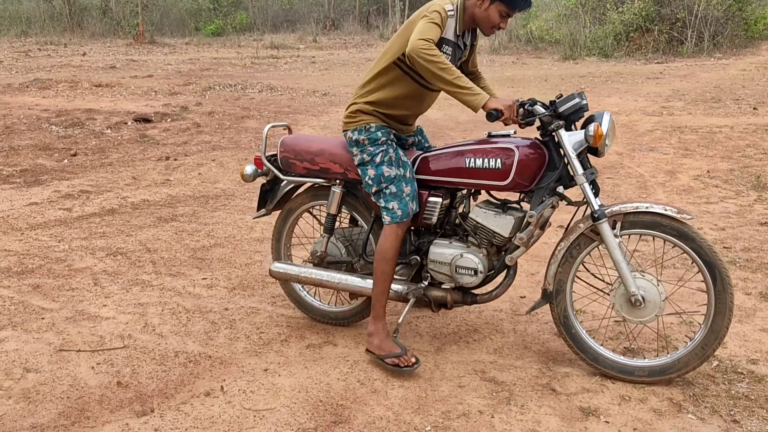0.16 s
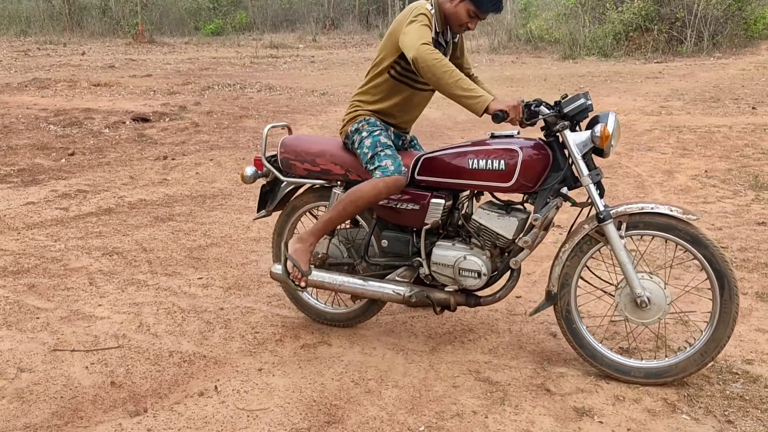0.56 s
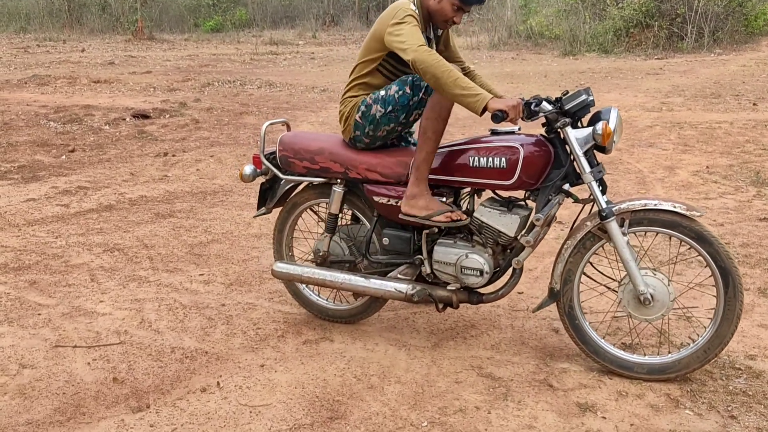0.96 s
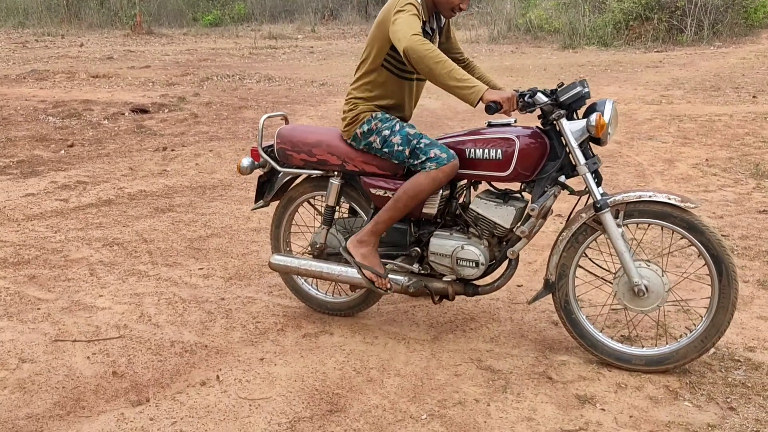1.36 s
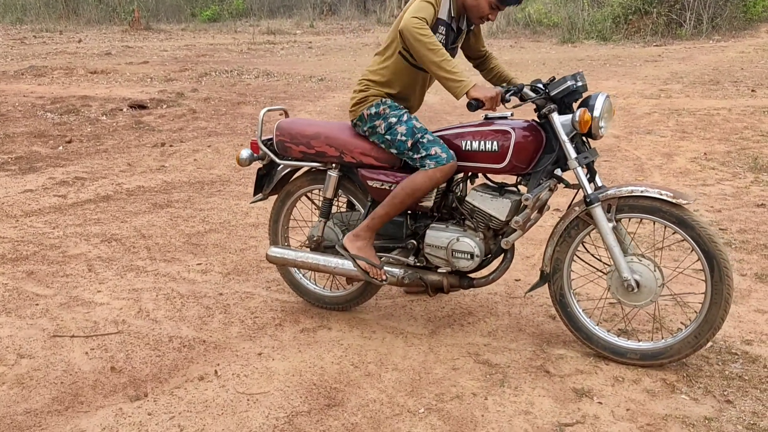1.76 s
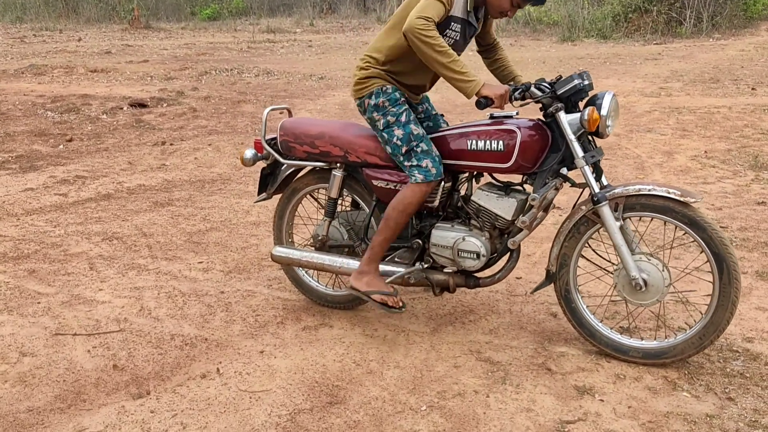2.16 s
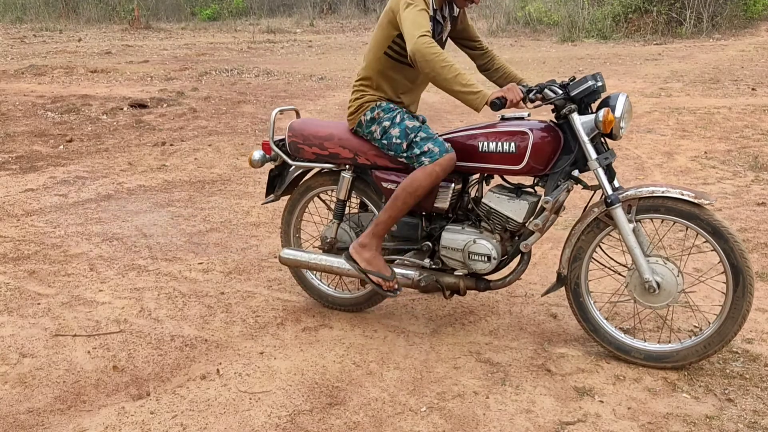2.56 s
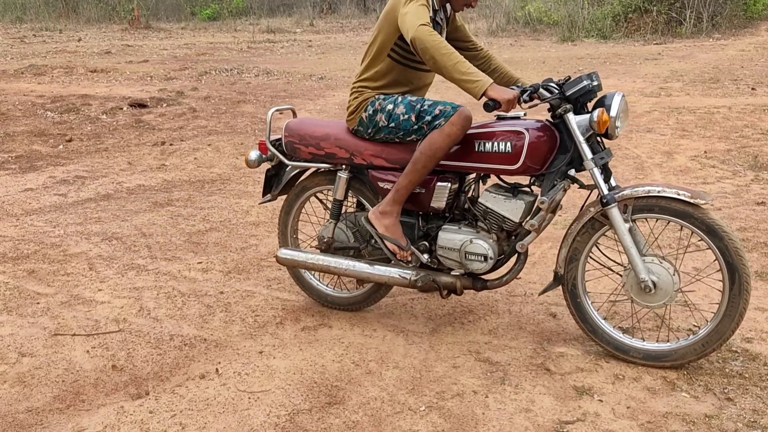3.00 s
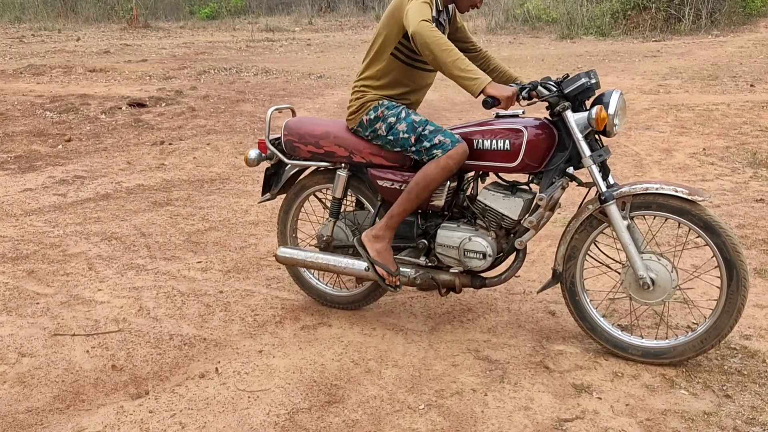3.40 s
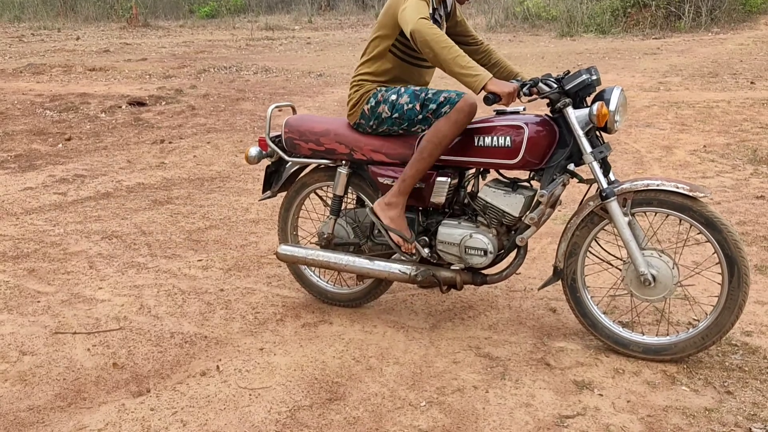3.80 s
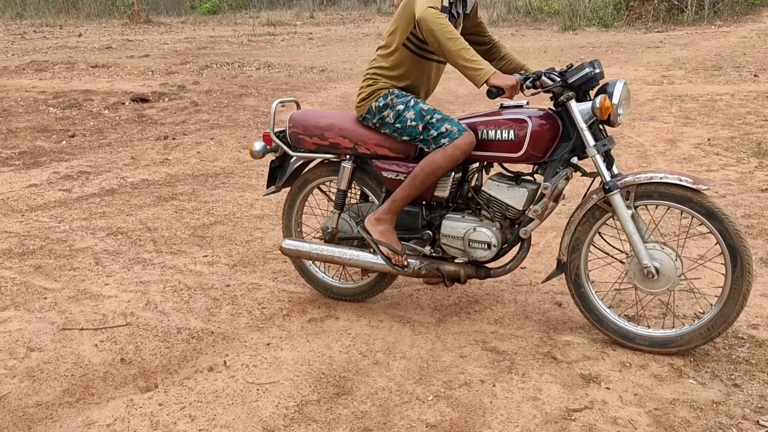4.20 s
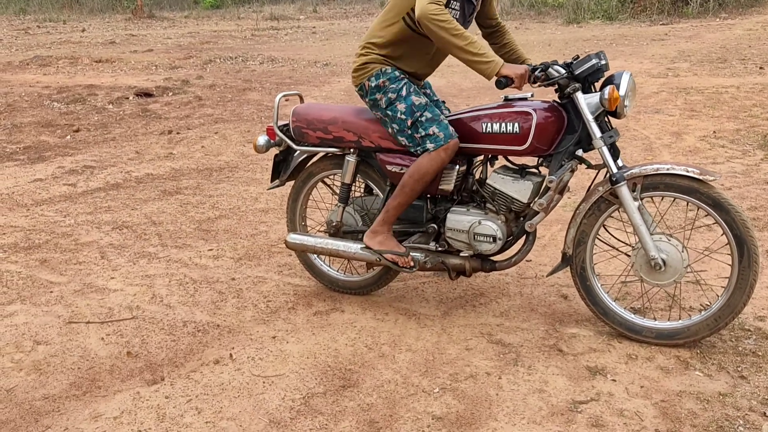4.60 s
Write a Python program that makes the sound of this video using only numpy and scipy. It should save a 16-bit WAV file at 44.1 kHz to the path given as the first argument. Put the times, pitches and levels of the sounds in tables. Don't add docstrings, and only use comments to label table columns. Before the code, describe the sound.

A small two-stroke engine is kicked over twice outdoors without firing, with dull exhaust thumps, rasping gears, metallic lever slams and foot clacks.

```python
import sys
import numpy as np
from scipy import signal
from scipy.fft import rfft, irfft, next_fast_len
from scipy.io import wavfile
from scipy.ndimage import uniform_filter1d

SR = 44100
rng = np.random.default_rng(int(sys.argv[2]) if len(sys.argv) > 2 else 0)


def bounce(signal):
    frames = np.transpose(np.atleast_2d(signal))
    limited = np.clip(frames, -1, 1)
    pcm = np.round(limited * 32767).astype(np.int16)
    wavfile.write(sys.argv[1], SR, pcm)


def magnitude_from_level(level_db):
    exponent = np.asarray(level_db, float) / 20
    return 10 ** exponent


N = 209430
TIME_S = np.arange(N) / SR
MIC_EDGE_HZ = 9750

# hz, level_db
PORT_BALANCE_DB = [(60, 5.5), (400, 5), (1500, 1.5), (3000, -0.5), (4500, 0.5), (6500, -7.5), (8500, 1),
                   (12000, 10)]


def rms_one(x):
    return x / np.sqrt(np.mean(x ** 2) + 1e-20)


def at_hz(points, hz):
    points_hz, values = np.transpose(points)
    return np.interp(np.log(hz), np.log(points_hz), values)


def add(track, start_s, sound):
    i = round(start_s * SR)
    track[..., i:i + sound.shape[-1]] += sound[..., :N - i]


def drift(rate_hz):
    r = np.exp(-80 * np.pi * rate_hz / SR)
    white = rng.standard_normal(N // 40 + 2002)
    slow = signal.lfilter([1], [1, -2 * r, r * r], white)[2000:]
    return np.interp(np.arange(N) / 40, np.arange(len(slow)), rms_one(slow))


def band(x, low_hz, high_hz):
    return signal.sosfilt(signal.butter(2, [low_hz, high_hz], "band", fs=SR, output="sos"), x)


def resonance(x, hz, width_hz):
    return np.sqrt(SR / 2 / width_hz) * band(x, hz - width_hz / 2, hz + width_hz / 2)


def grains(per_s, spread_db, shape):
    sizes = magnitude_from_level(spread_db * np.minimum(rng.exponential(1, shape), 4)) * rng.choice([-1, 1], shape)
    clicks = rms_one(sizes * (rng.random(shape) < per_s / SR))
    return rms_one(clicks / np.sqrt(uniform_filter1d(clicks ** 2, size=200, axis=-1) + 0.2))


def banded(source, spectrum, patchy_db, rate_hz):
    # hz, likeness
    likeness = [(60, 0.96), (300, 0.6), (1000, 0.23), (3000, 0.81), (9000, 0.22)]
    out, cuts_hz = 0, 20 * 2 ** np.arange(0, 9.6, .5)
    for k, (low, high) in enumerate(zip(cuts_hz, cuts_hz[1:])):
        hz = np.sqrt(low * high)
        if spectrum[0][0] < hz < spectrum[-1][0]:
            mid, side = band(source[k % 2], low, high)
            alike = at_hz(likeness, hz)
            gain = magnitude_from_level(at_hz(spectrum, hz) + patchy_db * drift(rate_hz))
            out = out + gain * (np.sqrt(1 + alike) * mid + np.sqrt(1 - alike) * side * [[1], [-1]])
    return rms_one(out)


def swell_fade(t, peak_s, db, swell_s, fade_s):
    return magnitude_from_level(db - 20 * np.where(t < peak_s, (peak_s - t) / swell_s, (t - peak_s) / fade_s))


def falling(top_hz, end_hz, length_s, bend):
    u = np.linspace(0, 1, round(length_s * SR))
    pitch_hz = end_hz + (top_hz - end_hz) * np.exp(-bend * u)
    return np.sqrt(np.abs(np.sin(np.pi * u))) * np.sin(2 * np.pi * np.cumsum(pitch_hz) / SR)


def wind(grit):
    # hz, level_db per Hz
    rumble_db = [(20, -8), (35, 0.5), (55, 0.5), (90, -4), (130, -17), (200, -19)]
    # time_s, level_db
    gusts = [(0.0, -65), (0.17, -61.5), (0.4, -56.5), (0.96, -61), (2.2, -62), (2.48, -57), (3.27, -61.5),
             (4.4, -56.5), (4.74, -58)]
    gust = magnitude_from_level(np.interp(TIME_S, *np.transpose(gusts)) + 2.5)
    rumble = banded(rng.standard_normal((2, 2, N)), rumble_db, patchy_db=1.0, rate_hz=4.0)
    return np.hypot(gust, magnitude_from_level(-12.5) * grit) * rumble


def drone(grit):
    # hz, level_db per Hz
    drone_db = [(80, -28.5), (120, -5), (165, 1.5), (210, 2), (300, -17), (450, -9), (650, -39.5),
                (900, -60.5)]
    # time_s, level_db
    far = [(0.0, -62.5), (0.24, -66), (0.43, -48.5), (0.79, -56.5), (1.29, -63.5), (2.3, -61.5),
           (2.48, -54.5), (2.84, -59.5), (4.74, -55)]
    strength = magnitude_from_level(np.interp(TIME_S, *np.transpose(far)) + 1.5)
    hum = banded(rng.standard_normal((2, 2, N)), drone_db, patchy_db=4.0, rate_hz=15.0)
    return np.hypot(strength, magnitude_from_level(-11) * grit) * hum


def moves():
    # peak_s, grit_db, cloth_over_grit_db, swell_s per 20 dB, fade_s per 20 dB
    rider = [(0.14, -76, 7.5, 1, -2.5), (0.25, -45, -8, 0.13, 0.47), (0.41, -40, 1.5, 0.18, 0.06),
             (0.65, -46.5, -11.5, 0.5, 0.16), (0.95, -66, -1.5, 1.3, 0.5), (1.3, -63.5, 4.5, 0.1, .5),
             (1.84, -54.5, 2.5, 0.37, 0.09), (1.96, -56.5, -2, 0.24, 0.16), (2.23, -68.5, 13, 0.1, 0.88),
             (2.32, -51, -11, 0.21, 0.85), (2.429, -38.5, -12, .08, 0.0833), (2.542, -40, 9.5, 0.052, 0.13),
             (2.6, -54.5, 12, -0.17, 0.21), (3.099, -62.5, -2, 0.2, -0.03), (3.532, -57.5, -15, 0.2, -0.25),
             (4.01, -58.5, -33, 0.33, 0.6), (4.2, -70, 4.5, 1.44, 0.94), (4.74, -62, 1, 0.4, 7)]
    t = np.arange(0, N + 64, 64) / SR
    peak_s, db, cloth_db, swell_s, fade_s = np.array(rider).T[:, :, None]
    grit = swell_fade(t, peak_s, db, np.abs(swell_s), np.abs(fade_s))
    total = [np.sqrt((g ** 2).sum(axis=0)) for g in (grit, grit * magnitude_from_level(cloth_db))]
    return [np.interp(TIME_S, t, g) for g in total]


def shuffle(grit):
    # hz, level_db per Hz
    shuffle_db = [(250, -9), (500, -4), (1000, -2.5), (2000, -8), (3500, -4.5), (5500, -22), (7000, -13.5)]
    crunch = grains(1500, spread_db=5.0, shape=(2, 2, N))
    return np.hypot(magnitude_from_level(-74.5), grit) * banded(crunch, shuffle_db, patchy_db=5.0, rate_hz=15.6)


def rustle(cloth):
    # hz, level_db per Hz
    rustle_db = [(2400, -30), (4000, -13), (5500, -9), (7500, -8), (9200, 3), (10500, -16), (12500, -11.5),
                 (15500, -12)]
    fibres = grains(5900, spread_db=5.0, shape=(2, 2, N))
    return np.hypot(magnitude_from_level(-83.5), cloth) * banded(fibres, rustle_db, patchy_db=0.0, rate_hz=15.0)


def bird():
    # start_s, top_hz, end_hz, length_s, level_db
    notes_sung = [(1.151, 4900, 2800, .06, -13), (1.553, 4900, 2800, .07, -4),
                  (1.948, 4600, 2850, .065, -4), (2.966, 4800, 2850, .038, -3),
                  (3.317, 4800, 2750, .033, -3), (3.623, 4500, 2850, .035, -2),
                  (4.008, 4500, 2850, .038, -2), (4.291, 4900, 3050, .03, -4), (4.59, 4900, 2950, .03, -4)]
    out = np.zeros(N)
    for s, top_hz, end_hz, length_s, db in notes_sung:
        add(out, s, magnitude_from_level(db) * falling(top_hz, end_hz, length_s, bend=90 * length_s))
    out = magnitude_from_level(-61.5 + 2.0 * drift(90)) * out
    return np.array([np.roll(out, -5), out])


def drag():
    # peak_s, level_db, swell_s per 20 dB, fade_s per 20 dB
    drags = [(1.56, -66, .15, .2), (1.78, -62, .2, .3), (1.9, -63, .2, .12), (0.42, -54, .1, .12),
             (3.37, -72, .1, .1)]
    t = np.arange(0, N + 64, 64) / SR
    gain = np.repeat(sum(swell_fade(t, *row) for row in drags), 64)[:N]
    hiss = resonance(grains(2500, spread_db=4.0, shape=(2, N)), hz=3600, width_hz=2400)
    return gain * magnitude_from_level(3.0 * drift(20)) * hiss


def short_knocks():
    # start_s, peak_db, pitch_hz, width as share of pitch, t60_s
    knock_rows = [(2.617, -38, 1140, .2, .05), (2.672, -50, 900, .2, .06), (2.715, -49, 1120, .2, .06),
                  (2.78, -44, 1050, .2, .06), (2.846, -48, 930, .2, .08), (0.4185, -35, 2900, .2, .02),
                  (0.4185, -34, 7800, .3, .03), (0.464, -33, 1600, .25, .025), (0.348, -36, 6800, .4, .05),
                  (0.311, -44, 7500, .5, .06), (0.404, -42, 2200, .8, .1), (0.018, -60, 7800, .3, .02),
                  (1.72, -60, 6000, .9, .04), (1.734, -58, 3000, .8, .03), (1.79, -60, 4000, .9, .03),
                  (1.925, -58, 8000, .4, .02), (3.555, -51, 5000, 1.2, .04), (3.8, -60, 7500, .5, .03),
                  (3.897, -52, 7200, .15, .03), (3.833, -61, 7500, .6, .03), (2.393, -25, 8600, .25, .03),
                  (4.542, -55, 4000, 1.2, .02), (1.3, -55, 900, .12, .2), (1.42, -54, 520, .2, .2),
                  (0.438, -36, 1900, .4, .02)]
    out, t = np.zeros(N), np.arange(SR // 8) / SR
    for s, db, hz, share, t60_s in knock_rows:
        hit = (1 - np.exp(-t / .0015)) * magnitude_from_level(-60 * t / t60_s) * rng.standard_normal(len(t))
        add(out, s, magnitude_from_level(db) * resonance(hit, hz, share * hz))
    return out


def metal(events, trim_db, per_s, vary_db, tail_db, treble_loss, muffle, top_db):
    # pitch_hz, width_hz, level_db
    frame = [(400, 60, 0), (520, 60, 0), (760, 80, -6)]
    case = [(900, 80, -4), (1120, 130, -1), (1390, 150, 0), (1700, 170, 0)]
    covers = [(2150, 196, -2), (2680, 290, 0), (2886, 230, 0), (3246, 167, -1), (3970, 330, -3.5)]
    bright = [(4535, 480, -4), (5480, 140, -14.5), (5460, 180, -8.5), (5960, 530, 1.5), (6694, 180, -1),
              (7460, 260, 6.5), (7810, 930, -3), (8230, 750, 3), (8630, 920, 2), (9690, 1000, 8.5),
              (11400, 450, -3), (12100, 1200, -18), (14500, 1200, -22.5)]
    modes = np.array(frame + case + covers + bright)
    part = np.repeat([0, 1, 2, 3], [len(frame), len(case), len(covers), len(bright)])
    force, t = np.zeros((len(modes), N)), np.arange(SR // 4) / SR
    luck = np.clip(rng.standard_normal((len(events), len(modes))), -2, 1)
    damping = (modes[:, :1] / 2000) ** treble_loss
    edge_db = top_db * (modes[:, 0] > MIC_EDGE_HZ + 500)
    for (s, db, covers_db, bright_db, frame_db, chatter_s, t60_s), own in zip(events, luck):
        after = damping * np.maximum(t - chatter_s, 0) / t60_s
        shape = (1 - np.exp(-4 * t / chatter_s)) * (magnitude_from_level(-60 * after) + magnitude_from_level(tail_db - 14 * after))
        part_db = np.array([frame_db, 0, covers_db, bright_db])[part]
        level_db = db + trim_db + part_db + vary_db * own + edge_db
        add(force, s, magnitude_from_level(level_db)[:, None] * shape)

    contact = grains(per_s, spread_db=3.0, shape=(3, N))
    both = contact[0] + .8 * contact[1:]
    other = np.roll(both, SR, axis=-1)
    end = round((max(row[0] for row in events) + .3) * SR)
    out = np.zeros((2, N))
    for shaken, grit, (hz, width_hz, db) in zip(force, [both, other] * len(modes), modes):
        late_s = max(3.864 / hz - .003, 0)
        ring = resonance(shaken[:end] * grit[:, :end] + 1e-18, hz, width_hz * muffle)
        add(out, late_s, magnitude_from_level(db) * ring)
    return out


def contacts(rows, covers_db, share, frame_db):
    return [(s, db, covers_db + share * hard_db, hard_db, frame_db, 0.0045, t60_s)
            for s, db, hard_db, t60_s in rows]


def clacks():
    # start_s, case_db, hardness_db, t60_s
    pedal = [(0.164, -49.5, 1.5, 0.015), (0.637, -40.5, 4, 0.04), (0.908, -43.5, -83, 0.05),
             (1.27, -41.5, 2, 0.048), (1.369, -41, -25, 0.099), (1.414, -40, -8, 0.072),
             (1.951, -52, 7, 0.025), (3.075, -55.5, -6, 0.04), (3.103, -56, -11.5, 0.12),
             (3.494, -43, -11.5, 0.047), (3.588, -45.5, -14.5, 0.063), (3.606, -45.5, -11, 0.046),
             (3.638, -44.5, -27, 0.067), (3.661, -40.5, -4.5, 0.055), (3.841, -56.5, -12, 0.086),
             (3.864, -49.5, -5.5, 0.064), (3.897, -50, -10, 0.052), (3.915, -38, -4, 0.045),
             (3.956, -39.5, -9.5, 0.04), (4.011, -40.5, -14.5, 0.051), (4.024, -52, 3.5, 0.044),
             (4.143, -68, 10, 0.033), (4.324, -59, -4, 0.062), (4.542, -53, 1, 0.034),
             (4.655, -56, -0.5, 0.072), (4.686, -63, 6.5, 0.12)]
    sandal = [(0.117, -54, -6.5, 0.25), (0.674, -34.5, -9.5, 0.073), (0.794, -42, -9.5, 0.15),
              (0.939, -44.5, -18, 0.1), (0.997, -44.5, -28, 0.054), (1.029, -54, -34, 0.03),
              (1.126, -47.5, -23, 0.076), (1.182, -53, 0, 0.076), (1.299, -47, -6, 0.21),
              (1.511, -52.5, -1, 0.41), (2.19, -56, -4.5, 0.23), (2.251, -45.5, -1, 0.024),
              (2.283, -43, -36, 0.46), (2.316, -43.5, -1, 0.12), (2.359, -40, -6.5, 0.41),
              (2.616, -47, 5.5, 0.03), (2.749, -45.5, -4.5, 0.17), (2.778, -42.5, -25, 0.065),
              (2.844, -47, -19, 0.1), (3.001, -40.5, -32, 0.043), (3.145, -55.5, -11, 0.12),
              (3.198, -51, -14, 0.1), (3.22, -45.5, -20, 0.058), (3.238, -58, -30, 0.029),
              (3.36, -40, -13, 0.14), (3.543, -43, -5, 0.18), (3.974, -52, -26, 0.046),
              (4.409, -57, 0, 0.084)]
    ticks = [(0.175, -57, 6.6, 0.12), (1.663, -74, 25, 0.02), (1.73, -98, 3, 0.028),
             (1.75, -61.5, 16.6, 0.054), (1.877, -58.5, 7.2, 0.23), (1.913, -53.5, 7.9, 0.02),
             (3.038, -63, 15.8, 0.14), (4.156, -73.5, 17, 0.034), (4.22, -77.5, 23.4, 0.051),
             (4.338, -66, 15, 0.04), (4.477, -67.5, 6, 0.055), (1.264, -61, 12, 0.016),
             (1.281, -55, 14.6, 0.03), (1.157, -68.5, 9.2, 0.3)]
    events = (contacts(pedal, covers_db=7.83, share=0.1, frame_db=-13)
              + contacts(sandal, covers_db=0, share=0.46, frame_db=-4)
              + contacts(ticks, covers_db=1.9, share=0.58, frame_db=-15))
    return metal(events, trim_db=-15, per_s=12000, vary_db=5, tail_db=-26.5,
                 treble_loss=.5, muffle=2.1, top_db=-13)


def falling_sweep():
    # start_s, top_hz, end_hz, length_s, level_db
    falling_tone = (2.395, 1600, 430, .023, -30)
    out = np.zeros(N)
    s, top_hz, end_hz, length_s, db = falling_tone
    add(out, s, magnitude_from_level(db) * falling(top_hz, end_hz, length_s, bend=2.6))
    return out


def lever():
    # pitch_hz, level_db, t60_s
    lever_modes = [(1718, -7, .07), (2043, -13, .05), (2155, -11, .06), (3850, -6.5, .04), (4270, -11, .05),
                   (4683, -11, .06), (6935, -9, .06), (7587, -10, .06), (7878, -7, .07), (8479, -7, .06),
                   (8810, -2, .05), (9090, -1.5, .06), (13200, -8, .012), (14900, -6, .012),
                   (860, -11, .03), (3240, -12, .05), (5090, -13, .07), (5610, -10, .04), (5800, -13, .07),
               (6160, -13, .05), (6510, -11, .06), (7225, -8, .06), (8640, -5, .03), (9306, -4, .06),
               (11280, -2, .06), (12080, -5, .04), (12400, -5, .06), (12830, -4, .06)]
    # start_s, rise_s, hold_s, fall_s, level_db
    grind_back = (2.513, .006, .024, .007, -18)
    # hz, level_db
    lever_balance_db = [(1500, 0), (4000, -10.5), (7000, -7.5), (8000, -3.5), (8700, 9.5), (9300, 4.5),
                        (13000, -1.5)]
    s, rise_s, hold_s, fall_s, db = grind_back
    modes = lever_modes
    t, out = np.arange(SR // 4) / SR, np.zeros((2, N))
    sag_s = .05
    shape = (1 - np.exp(-(t / rise_s) ** 2)) * np.exp(-t / sag_s - np.maximum(t - hold_s, 0) / fall_s)
    grind = shape * grains(3900, spread_db=4.0, shape=(len(modes), len(t)))
    for teeth, (hz, level_db, t60_s) in zip(grind, modes):
        r, w = magnitude_from_level(-60 / (t60_s * SR)), 2 * np.pi * hz / SR
        ring = np.sqrt(1 - r * r) * signal.lfilter([0, np.sin(w)], [1, -2 * r * np.cos(w), r * r], teeth)
        lean_db = (at_hz(lever_balance_db, hz) - at_hz(PORT_BALANCE_DB, hz)) / 2
        add(out, s, magnitude_from_level(db + level_db + np.array([[lean_db], [-lean_db]])) * ring)
    return out


def slams():
    # start_s, case_db, hardness_db (bright parts over case), frame_over_case_db, chatter_s
    kicks = [(0.207, -33, -37, -8, 0.0065), (0.232, -38, -27, -10, 0.021), (0.339, -36, 2.5, 6.5, 0.015),
             (0.367, -47.5, 16, -15, 0.0075), (0.417, -25, -10, -15, 0.011),
             (0.435, -29, -11.5, -24, 0.012), (0.463, -25.5, -6.5, -29, 0.0036),
             (0.547, -23.5, -3.5, -6.5, 0.0042), (0.562, -29.5, -9.5, -1.5, 0.015),
             (0.577, -30, 0.3, -21, 0.016), (0.593, -33.5, 0.5, 2.5, 0.0027),
             (0.755, -25.5, -1.5, -8, 0.0035), (0.77, -32.5, -48, 5.5, 0.0025),
             (2.392, -18, 2, -5.5, 0.002), (2.404, -24.5, -30, 3, 0.005)]
    snap_back = [(2.513, -27.5, 11, -1, 0.028)]
    # covers_over_case_db, share of the hardness they follow
    slam_covers = (2.6, 0.38)
    covers_db, share = slam_covers
    events = [(s, db, covers_db + share * hard_db, hard_db, frame_db, chatter_s, 0.041)
              for s, db, hard_db, frame_db, chatter_s in kicks + snap_back]
    return metal(events, trim_db=-18.0, per_s=3500, vary_db=4.0, tail_db=-20,
                 treble_loss=0.056, muffle=1.5, top_db=-4.5)


def intake():
    # start_s, peak_db, pitch_hz, t60_s
    gulps = [(0.271, -28, 199.8, 0.26), (0.389, -32, 193.5, 0.37), (0.515, -37.5, 181.9, 0.6),
             (0.674, -53, 171, 0.31), (2.345, -38, 202, 0.11), (2.445, -24.5, 189.4, 0.17),
             (2.573, -60, 194, 0.096), (2.657, -35, 168.4, 0.13), (2.705, -44, 194, 0.089)]
    rise_s, gulp_s, after_db = 0.001, 0.016, -5.5
    out, t = np.zeros(N), np.arange(SR // 4) / SR
    for s, db, hz, t60_s in gulps:
        shape = np.exp(-(t / gulp_s) ** 4) + magnitude_from_level(after_db - 30 * t / t60_s)
        add(out, s, magnitude_from_level(db - 1.5) * np.sin(2 * np.pi * hz * t) * (1 - np.exp(-t / rise_s)) * shape)
    return out


def exhaust():
    # start_s, peak_db, first_pitch_hz, t60_s
    thumps = [(0.246, -22.5, 233, 0.056), (0.345, -26, 236, 0.063), (0.458, -28.5, 243.6, 0.056),
              (0.593, -32.5, 223, 0.056), (0.753, -44, 232, 0.056), (2.316, -23, 225.5, 0.066),
              (2.413, -25, 242.6, 0.07), (2.509, -24.5, 250, 0.046), (2.638, -26.5, 250.4, 0.049),
              (2.794, -34, 252, 0.042)]
    sag_s, floor_hz, rise_s = .014, 92, 0.0054
    edge_db, puff_db = -7.5, -16.5
    push_db, push_at_s, push_s = -10.5, .0155, 0.0027
    out, t = np.zeros(N), np.arange(SR // 5) / SR
    push = magnitude_from_level(push_db) * np.exp(-((t - push_at_s) / push_s) ** 2)
    rise = (t / rise_s) ** 2 / (1 + (t / rise_s) ** 2)
    puffs = resonance(rng.standard_normal((len(thumps), len(t))), hz=404, width_hz=350)
    for (s, db, hz, t60_s), puff in zip(thumps, puffs):
        pitch_hz = floor_hz + (hz - floor_hz) / (1 + (t / sag_s) ** 4)
        phase = 2 * np.pi * np.cumsum(pitch_hz) / SR
        swing = -np.sin(phase) + magnitude_from_level(edge_db) * np.sin(2 * phase) * np.exp(-t / sag_s)
        shape = rise * magnitude_from_level(-60 * (t / t60_s) ** 2)
        add(out, s - .003, magnitude_from_level(db + 3) * ((swing + magnitude_from_level(puff_db) * puff) * shape - push))
    return out


def scene():
    grit, cloth = moves()
    background = wind(grit) + drone(grit) + shuffle(grit) + rustle(cloth) + bird()
    contact = drag() + short_knocks() + clacks()
    starter = falling_sweep() + lever() + slams()
    return background + contact + starter + intake() + exhaust()


def low_pass(x):
    return signal.sosfilt(signal.butter(12, 15680, fs=SR, output="sos"), x)


def record(dry):
    shelf_db, edge_width_hz, top_hz = -15, 170, 15450
    left_lag_samples = 5.98
    size = next_fast_len(N + 256)
    hz = np.maximum(np.arange(size // 2 + 1) * SR / size, 1)
    tilt = magnitude_from_level(at_hz(PORT_BALANCE_DB, hz) / 2)
    shelf = magnitude_from_level(shelf_db / (1 + np.exp((MIC_EDGE_HZ - hz) / edge_width_hz))) * (hz < top_hz)
    lag = np.exp(-2j * np.pi * hz * left_lag_samples / SR)
    ports = shelf * np.array([tilt * lag, 1 / tilt])
    mix = irfft(rfft(dry, size) * ports, size)[:, :N]
    return low_pass(mix)


dry = scene()
out = record(dry)
bounce(out)
```